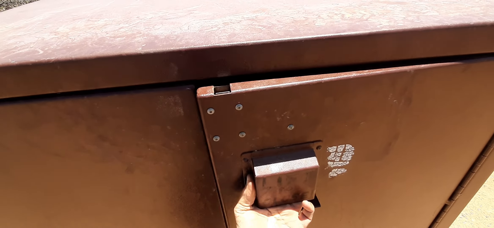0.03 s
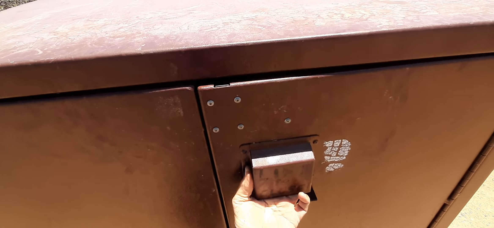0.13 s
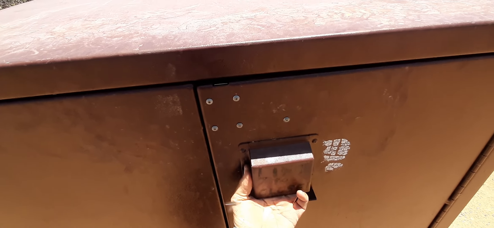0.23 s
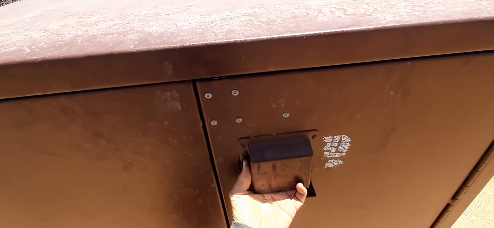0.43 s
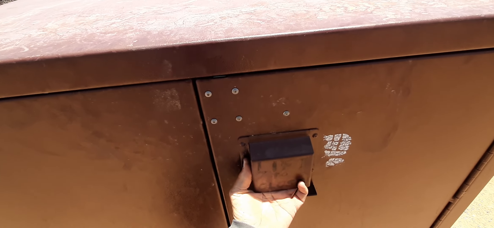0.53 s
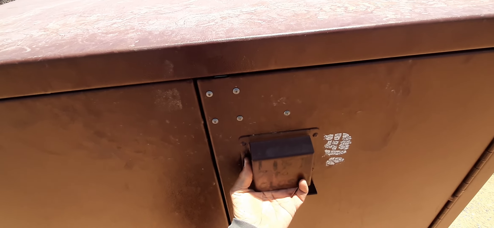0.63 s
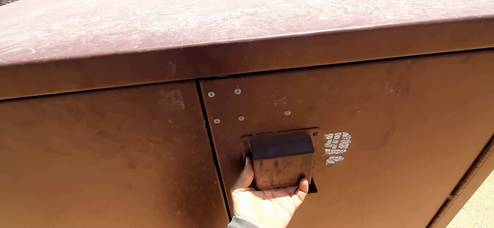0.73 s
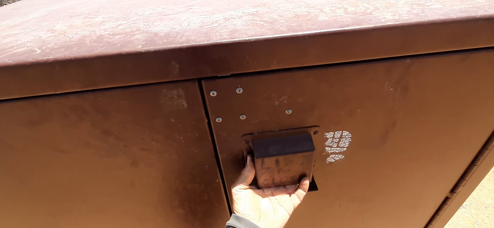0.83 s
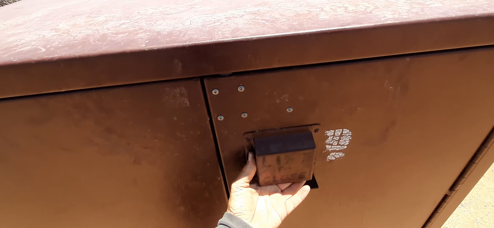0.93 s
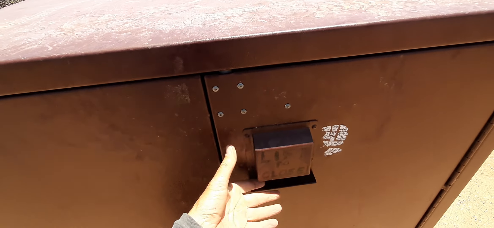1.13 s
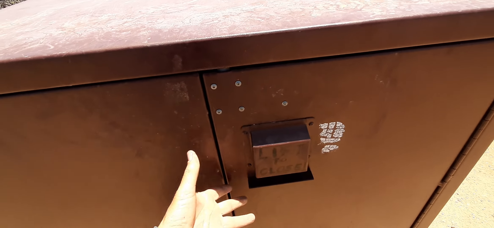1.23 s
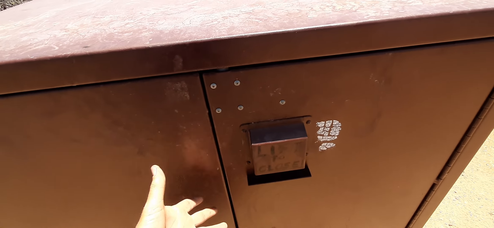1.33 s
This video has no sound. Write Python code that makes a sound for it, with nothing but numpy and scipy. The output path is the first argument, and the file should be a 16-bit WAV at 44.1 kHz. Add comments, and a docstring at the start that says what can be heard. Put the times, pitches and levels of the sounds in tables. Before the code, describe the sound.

Metal box door banging shut with a booming rattle, followed by the latch clacking closed.

```python
"""Outdoors, at a sheet-steel box. Its door is pushed shut: it strikes, rebounds and rattles home.
Each blow clangs and rings the metal: the hollow box hums, the sheet sings on, the panel booms,
while the bolt clanks on its keeper and the loose latch chatters. The handle then scrapes and
squeaks, clacks into place and ticks twice as the hand lets go, over a faint bed of open air."""
import sys
import numpy as np
from scipy import signal
from scipy.fft import rfft, irfft
from scipy.io import wavfile
from scipy.ndimage import uniform_filter1d

SR = 44100
rng = np.random.default_rng(int(sys.argv[2]) if len(sys.argv) > 2 else 0)


def wav_record(signal):
    """Record a signal, one row per channel, as 16-bit PCM in the file named by sys.argv[1]."""
    frames = np.transpose(np.atleast_2d(signal))
    bounded = np.clip(frames, -1, 1)
    # unit amplitude maps onto the largest positive 16-bit level
    quanta = np.round(bounded * 32767).astype(np.int16)
    wavfile.write(sys.argv[1], SR, quanta)


N = 61739
TIME, BIN_HZ = np.arange(N) / SR, np.fft.rfftfreq(N, 1 / SR)
ATTACK_S, BOX_RISE_S, RING_RISE_S = 0.0011, 0.0043, 0.006
DOOR_CRACK, LATCH_CRACK = 0.26, 0.59  # extra gain on the transient


def amp(db):
    """Decibels to gain."""
    return 10 ** (np.asarray(db) / 20)


def unit(x):
    """Scales to rms 1."""
    return x / np.sqrt(np.mean(x ** 2) + 1e-20)


def curve(table, hz, column=1):
    """One column of a table, interpolated over log frequency."""
    columns = np.transpose(table)
    return np.interp(np.log(hz + 1), np.log(columns[0] + 1), columns[column])


def swell(s, width_s):
    """A bell-shaped fade in and out, peaking at s seconds."""
    return np.exp(-((TIME - s) / width_s) ** 2)


def add(mix, s, sound):
    """Mixes a stereo sound in at s seconds."""
    part = mix[:, round(s * SR):][:, :sound.shape[1]]
    part += sound[:, :part.shape[1]]


# stereo image at the microphone's two ports: f/Hz, correlation, left minus right/dB
STEREO_IMAGE = [(60, 0.49, 0.5), (200, 0.99, 0), (400, 0.82, 1.5), (800, 0.43, -5), (1700, -0.16, -5),
                (3500, -0.23, -2.5), (7000, 0.1, -1), (13000, -0.19, -1)]


def pan(hz):
    """Left and right gains at these frequencies."""
    half_db = curve(STEREO_IMAGE, hz, column=2) / 2
    return amp([half_db, -half_db])


def noise(colour, peaks_db=0):
    """Stereo noise of rms 1 with this spectrum, as the two ports hear it."""
    left, other = rfft(rng.standard_normal((2, N)))
    likeness = np.clip(curve(STEREO_IMAGE, BIN_HZ), -1, 1)
    right = likeness * left + np.sqrt(1 - likeness ** 2) * other
    return unit(irfft(np.array([left, right]) * pan(BIN_HZ) * amp(curve(colour, BIN_HZ) + peaks_db), N))


def mode_peaks(depth_db=2, spacing_hz=32):
    """An object's random strong and weak high modes, as a ripple in dB."""
    heights = rng.standard_normal(4000)
    ripple = np.interp(BIN_HZ / spacing_hz, np.arange(len(heights)), heights)
    return depth_db * BIN_HZ / (BIN_HZ + 600) * np.clip(ripple, -2, 2)


def crash(table, peaks_db, treble_db, bass_db, crack, treble_hz=2500, bass_hz=473, crack_s=0.018):
    """Countless modes struck at once: a crack, then each band dies at its own speed."""
    hz, s, bands = signal.stft(noise(table, peaks_db), SR, nperseg=256, noverlap=192)
    f = hz[:, None]
    fade = np.exp(-np.log(1000) * s / np.maximum(curve(table, f, column=2), .02))
    shelves = amp(treble_db * f ** 2 / (f ** 2 + treble_hz ** 2) + bass_db / (1 + (f / bass_hz) ** 2))
    tail = signal.istft(bands * fade * shelves, SR, nperseg=256, noverlap=192)[1][:, :N]
    return tail * (1 - np.exp(-TIME / ATTACK_S)) * (1 + crack * np.exp(-TIME / crack_s))


def ring(modes, hits, rise_s, left_lead_s=0.00017, max_gap_turns=0.24):
    """Each hit (t/s, level/dB) feeds energy to modes that bloom and die, the left side leading."""
    kicks, out = np.zeros(N), np.zeros((2, N))
    for s, db in hits:
        kicks[round(s * SR)] += amp(db) ** 2
    lag = np.exp(-1 / (rise_s * SR))
    for hz, db, t60 in modes:
        energy = signal.lfilter([1], [1, -np.exp(-2 * np.log(1000) / (t60 * SR))], kicks)
        envelope = signal.lfilter([1 - lag], [1, -lag], np.sqrt(energy))
        spread = np.array([[1], [-1]]) * np.pi * min(hz * left_lead_s, max_gap_turns)
        tone = np.sin(2 * np.pi * hz * (TIME - hits[0][0]) + spread)
        out += amp(db) * pan(hz)[:, None] * envelope * tone
    return out


# colour of the outdoor bed: f/Hz, level/dB
BED_COLOUR = [(25, 0.5), (70, 4), (200, -16.5), (600, -29), (1600, -23.5), (2600, -35.5), (8000, -44),
              (15000, -29)]
# colour of the wind: f/Hz, level/dB
WIND_COLOUR = [(25, -19), (60, 5), (130, -16.5), (200, -28), (600, -75)]
# puffs of wind: t/s, half width/s, level/dB
WIND_PUFFS = [(0.053, 0.013, -39), (.12, .04, -45.5)]


def open_air():
    """A steady outdoor bed, with puffs of wind on the left port."""
    puffs = sum(amp(db) * swell(s, width) for s, width, db in WIND_PUFFS)
    return puffs * noise(WIND_COLOUR) * [[1], [0]] + amp(-61) * noise(BED_COLOUR)


# colour of the pushed air: f/Hz, level/dB
PUSH_COLOUR = [(30, -13), (60, -11.5), (200, -13.5), (400, -24), (900, -25), (2500, -58)]


def air_push(rise_s=0.0099):
    """Air squeezed out ahead of the door, peaking on the first blow."""
    return amp(-37) * np.exp(-abs(TIME - DOOR_BLOWS[0][0]) / rise_s) * noise(PUSH_COLOUR)


# the door's blows: t/s, clang/dB, treble/dB, bass/dB, box hum/dB, sheet ring/dB
DOOR_BLOWS = [(0.214, 0, 2.5, 3.5, -6, 3.5), (0.324, -34, 3.5, -0.5, -27, -23.5),
              (0.3736, 5.5, -2, -3, -14, -5.5), (.405, -8, 0.5, 2.5, -7, -6.5),
              (0.4206, -4.5, 5, -1, 1.5, -5.5), (.438, -0.5, 0.5, 0, 1.5, -3.5),
              (.458, -3.5, -7, -8.5, -13.5, -6.5), (.491, -7.5, 0, -7.5, -18.5, -6),
              (0.559, -19, 5.5, -4, -25, -13)]
# the door's crowded modes: f/Hz, level/dB, t60/s
CLANG_BANDS = [(40, -25, 1), (110, 6.5, 0.77), (330, 5, 0.94), (600, -5.5, 0.8), (1072.6, -2.5, 0.53),
               (1866, -1.5, 0.55), (2600, -5.5, 0.31), (3400, -0.5, .29), (5000, -7.5, 0.18),
               (6310, -6, 0.15), (7440, -18.5, .16), (8700, -29, 0.098), (11240, -16.5, 0.16),
               (15500, -12, 0.037)]


def door_clang(level_db=-16.5):
    """Steel on steel: every blow strikes the same dense cluster of modes."""
    out, peaks = np.zeros((2, N)), mode_peaks()
    for s, db, treble_db, bass_db, _, _ in DOOR_BLOWS:
        add(out, s, amp(level_db + db) * crash(CLANG_BANDS, peaks, treble_db, bass_db, DOOR_CRACK))
    return out


# modes of the hollow box: f/Hz, level/dB, t60/s
BOX_MODES = [(118.1, -10.5, 1.6), (134.64, -5.5, 2.36), (172.9, -1, 1.13), (196.4, 4, 0.86),
             (214, -8.5, 1.58), (227.8, -7, 1.59), (265.2, -10, .5), (292, -9.5, 0.76), (321.3, -18, 0.64),
             (348.4, -2.5, 0.41), (363.5, -14, 1.4), (419.2, -8.5, 1)]


def box_hum(seated_s=1.03, damping_s=.02, damping_db=-7.5):
    """The blows set the box humming; once the bolt is seated the hand damps it, the released handle knocks it
    again."""
    hum = ring(BOX_MODES, [(s, db) for s, *_, db, _ in DOOR_BLOWS], BOX_RISE_S)
    damping = amp(damping_db * np.clip((TIME - seated_s) / damping_s, 0, 1))
    knock = ring(BOX_MODES, [(LATCH_HITS[-2][0], -21.5)], BOX_RISE_S)
    return amp(-22.5) * (damping * hum + knock)


# modes of the steel sheet: f/Hz, level/dB, t60/s
SHEET_MODES = [(579, -9, 1.3), (686, -4.5, 1.19), (764, -2.5, .7), (1000, -1.5, 0.31), (1017, -6.5, 1.52),
               (1150, -0.5, 0.77), (1395, -5, 0.91), (1500, 6, 0.28), (1538, -2, .7), (1571, 0.5, 0.5),
               (1605, 4.5, .7), (1742, -8.5, 1), (1937, -6, .6), (1947, -3, 0.55), (2016, 5, 0.49),
               (2070, -8.5, 1.1), (2820, -11.5, 0.18), (2883, 2, 0.29), (3240, -19, 0.41), (3330, 1, 0.3),
               (3750, -10, 0.14), (3800, -14.5, 0.17), (4180, -4.5, .22), (4526, -4, .22)]


def sheet_ring():
    """The sheet rings on after each door blow and latch hit."""
    hits = [(s, db) for s, *_, db in DOOR_BLOWS] + [(s, db) for s, *_, db, _ in LATCH_HITS]
    return amp(-34.5) * ring(SHEET_MODES, hits, RING_RISE_S)


# the handle's singing note: f/Hz, level/dB, t60/s
HANDLE_MODES = [(1560, 0.5, 0.57), (1606, -10.5, .35)]


def handle_ring(swing_db=-68, jolt_db=-22.5, latch_db=-38.5):
    """Barely ringing as the door swings, the handle sings out on the first blow and the latch hits."""
    hits = [(0, swing_db), (DOOR_BLOWS[0][0], jolt_db)]
    hits += [(s, latch_db + db) for s, *_, db in LATCH_HITS]
    return ring(HANDLE_MODES, hits, RING_RISE_S)


# flexes of the panel: t/s, level/dB
PANEL_FLEXES = [(.239, 1.5), (.378, 1.5), (0.449, -10.5), (1.12, -17.5)]
# modes of the panel: f/Hz, level/dB, t60/s
PANEL_MODES = [(53.9, -6, 1), (68.9, 2, 0.84), (82, -15, .45), (93.3, -4, 0.36)]


def panel_boom():
    """The whole panel flexes, giving the slam its low end."""
    return amp(-16) * ring(PANEL_MODES, PANEL_FLEXES, rise_s=0.004)


# the bolt's strikes on its keeper: t/s, level/dB
KEEPER_STRIKES = [(.3738, -2.5), (.438, -2.5)]
# modes of the keeper: f/Hz, level/dB, t60/s
KEEPER_MODES = [(952, -7, 0.4), (1084, 0.5, 0.22), (1145, -1, 0.3), (2052, -3.5, 0.38), (3320, -1.5, 0.15),
                (3546, 0, 0.15)]


def keeper_clank():
    """The bolt clanks against its keeper as the door rebounds and lands."""
    return amp(-23.5) * ring(KEEPER_MODES, KEEPER_STRIKES, ATTACK_S)


def latch_chatter(knocks_per_s=700, fade_s=0.012):
    """Tiny bright knocks of the loose latch fill the gaps between the blows."""
    knocks = rng.standard_normal(N) * (rng.random(N) < knocks_per_s / SR) * swell(0.45, width_s=0.054)
    knock = crash(CLANG_BANDS, peaks_db=0, treble_db=12, bass_db=0, crack=DOOR_CRACK)
    knock *= np.exp(-TIME / fade_s)
    return amp(-40.5) * signal.oaconvolve(knock, knocks[None])[:, :N]


# the latch's hits: t/s, level/dB, treble/dB, sheet ring/dB, handle ring/dB
LATCH_HITS = [(.895, -35, -7.5, -26.5, -25), (.968, -9, -26, -11.5, -3), (1.0155, -4.5, -20, -7.5, -17),
              (1.0261, -3.5, 3, -24, -21), (1.147, -34, -7.5, -35, -30), (1.2321, -16, -14.5, -19, -3),
              (1.3233, -22, -8.5, -22, -7)]
# the latch's crowded modes: f/Hz, level/dB, t60/s
CLACK_BANDS = [(100, -18, 0.47), (350, -16, 0.67), (700, -5.5, 0.25), (1300, -3, 0.3), (2000, -1.5, 0.25),
               (2900, 0.5, 0.19), (3670, -2, 0.24), (4860, -3, 0.12), (6500, -7.5, 0.12),
               (7560, -22.5, 0.13), (8200, -34, 0.1), (11900, -21.5, 0.11), (15500, -15.5, 0.082)]
# modes of the bolt: f/Hz, level/dB, t60/s
BOLT_MODES = [(984, -8, 0.39), (2090, -7.5, 0.29), (2970, -13.5, 0.18), (3403, 0.5, 0.17),
              (3450, -0.5, 0.13), (3677, 4.5, 0.098), (3976, 1, 0.096), (3850, 7.5, 0.039), (4180, 3, .07)]


def latch_clack(clack_db=-14.5, bolt_db=-20):
    """The latch snaps and ticks; the brighter the hit, the more the bolt rings."""
    out, peaks = np.zeros((2, N)), mode_peaks()
    for s, db, treble_db, _, _ in LATCH_HITS:
        add(out, s, amp(clack_db + db) * crash(CLACK_BANDS, peaks, treble_db, 0, LATCH_CRACK))
    bolt_hits = [(s, db + treble_db) for s, db, treble_db, *_ in LATCH_HITS]
    return out + amp(bolt_db) * ring(BOLT_MODES, bolt_hits, ATTACK_S)


# strokes of the handle: t/s, length/s, level/dB, tilt/dB per octave
HANDLE_STROKES = [(0.927, 0.058, 1.5, -3.5), (0.993, 0.064, 2, 1.5), (1.109, 0.022, 1, -4.5),
                  (1.135, 0.036, -20, 7.5)]
# resonances of the rubbing handle: f/Hz, width/Hz, level/dB
RUB_BANDS = [(534, 77, -6), (1024, 66, -3.5), (1210, 160, -4), (1940, 370, -8), (3500, 500, -30)]


def handle_scrape(slips_per_s=4300, rub_db=-37.5, rise_s=0.0098, fade_s=0.028):
    """Dense small slips of the sliding handle excite its resonances, over a soft grit."""
    slips = rng.standard_normal((2, N)) * (rng.random(N) < slips_per_s / SR)
    grit = amp(-47) * noise(CLACK_BANDS)  # heard through the latch body
    out, voices, tilt_centre_hz = np.zeros((2, N)), [], RUB_BANDS[1][0]
    for hz, width, db in RUB_BANDS:
        band = signal.butter(2, [hz - width / 2, hz + width / 2], "band", fs=SR, output="sos")
        voices.append((hz, amp(rub_db + db) * pan(hz)[:, None] * unit(signal.sosfilt(band, slips))))
    for s, length, db, tilt_db in HANDLE_STROKES:
        attack = np.clip((TIME - s) / rise_s, 0, 1)
        release = np.exp(-np.maximum(TIME - s - length, 0) / fade_s)
        rub = sum(amp(tilt_db * np.log2(hz / tilt_centre_hz)) * voice for hz, voice in voices)
        out += amp(db) * attack * release * (amp(2 * tilt_db) * grit + rub)
    return out


# squeaks of the handle's pivot: t/s, length/s, f/Hz, level/dB
PIVOT_SQUEAKS = [(0.935, 0.062, 1031, -37.5), (1.114, 0.03, 1223, -33)]


def pivot_squeak(waver_depth=.1):
    """The pivot catches briefly on a rough, wavering note."""
    out = np.zeros((2, N))
    for s, length, hz, db in PIVOT_SQUEAKS:
        t = np.arange(0, length, 1 / SR)
        waver = unit(uniform_filter1d(rng.standard_normal(N), size=120))[:len(t)]
        note = np.sin(2 * np.pi * np.cumsum(hz * (1 + waver_depth * waver)) / SR)
        arch = np.sqrt(abs(np.sin(np.pi * t / length)))
        add(out, s, amp(db) * pan(hz)[:, None] * arch * note)
    return out


# colour of the handling rumble: f/Hz, level/dB
RUMBLE_COLOUR = [(30, -16), (70, -2), (130, 0), (230, 2), (400, -8), (800, -10.5), (1600, -18), (3000, -24),
                 (8000, -56)]


def hand_rumble():
    """The box rumbles softly under the hand."""
    return amp(-41) * swell(1.21, width_s=0.24) * noise(RUMBLE_COLOUR)


def scene():
    """The slam, then the latching, in the open air."""
    slam = door_clang() + panel_boom() + keeper_clank() + latch_chatter()
    ringing = box_hum() + sheet_ring() + handle_ring()
    latching = latch_clack() + handle_scrape() + pivot_squeak()
    return slam + ringing + latching + air_push() + open_air() + hand_rumble()


def record(dry, low_cut_hz=38, band_limit_hz=16000):
    """The microphone's low cut, overload at full scale, then the band limit."""
    thinned = signal.sosfilt(signal.butter(4, low_cut_hz, "high", fs=SR, output="sos"), dry)
    low_pass = signal.firwin(511, band_limit_hz, window=("kaiser", 9), fs=SR)
    return signal.oaconvolve(np.clip(thinned, -1, 1), low_pass[None], "same")


dry = scene()
out = record(dry)
wav_record(out)
```